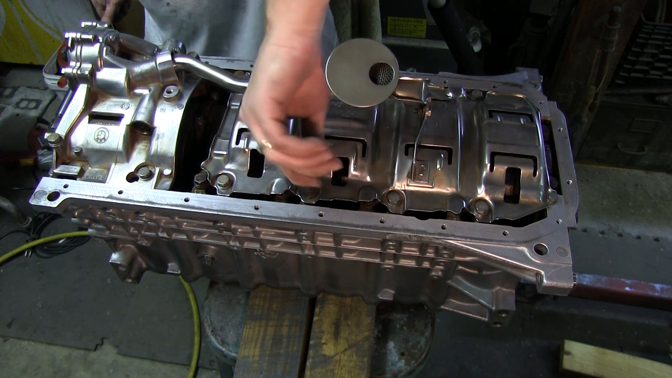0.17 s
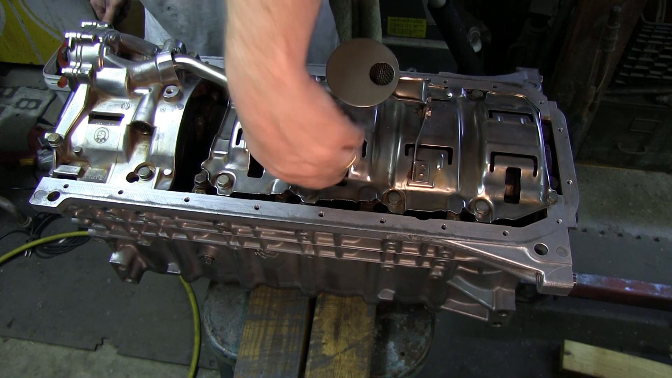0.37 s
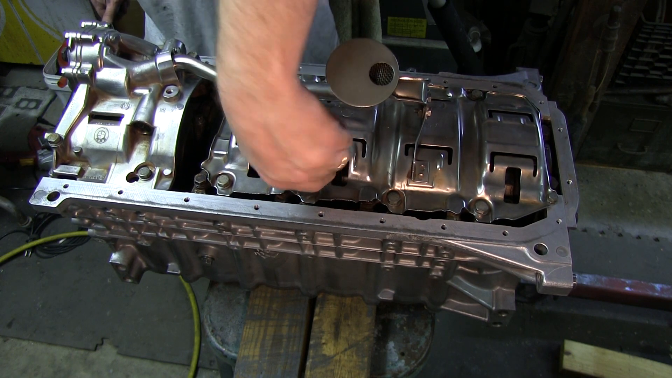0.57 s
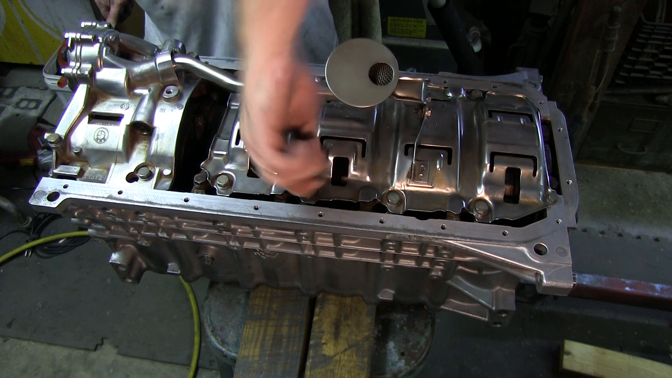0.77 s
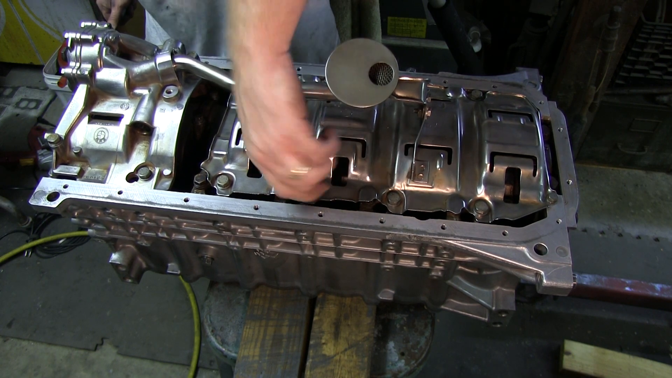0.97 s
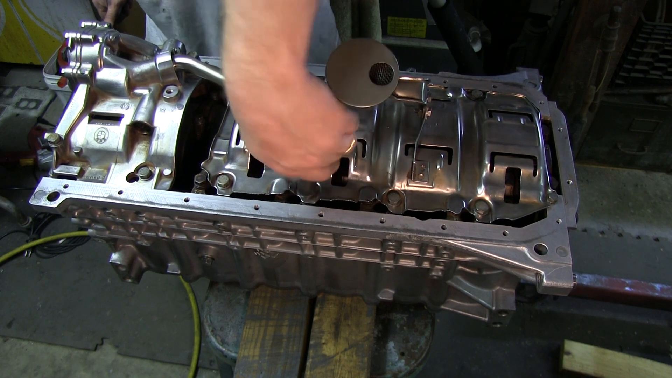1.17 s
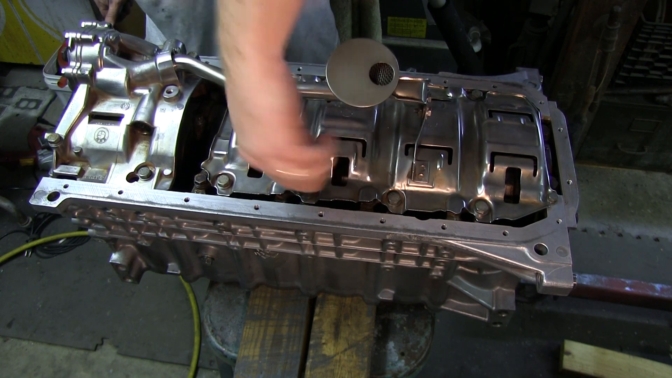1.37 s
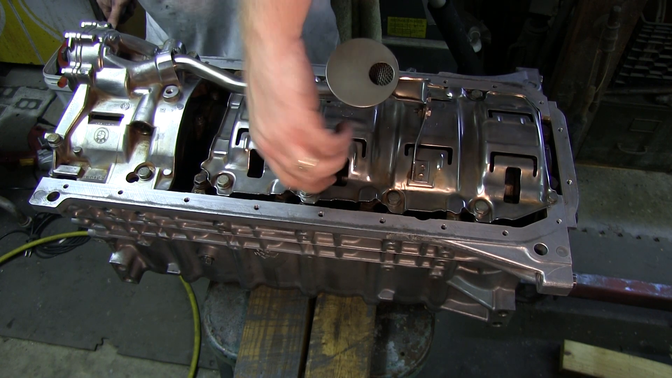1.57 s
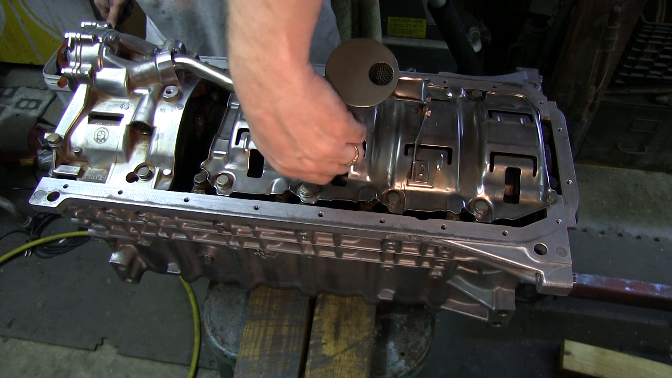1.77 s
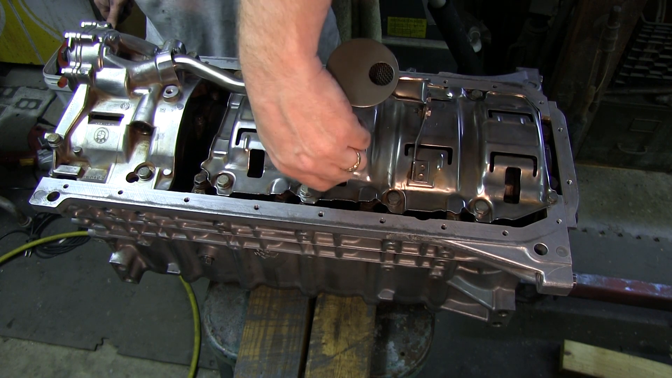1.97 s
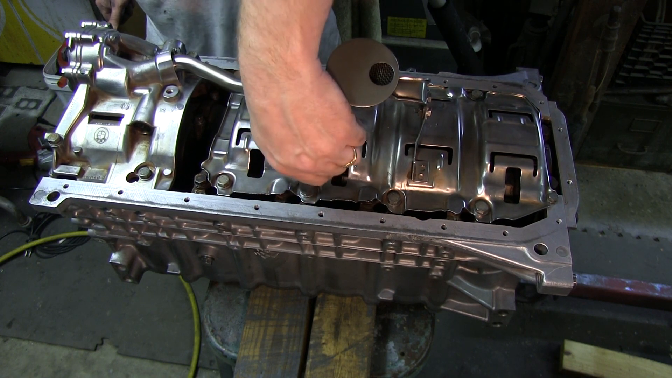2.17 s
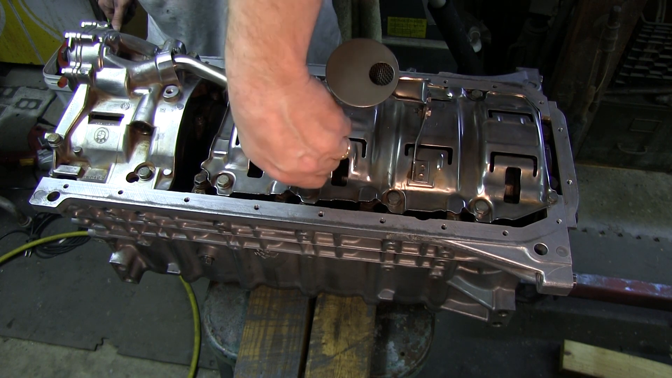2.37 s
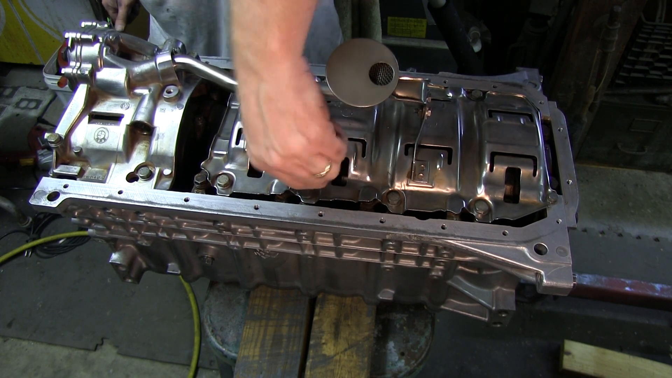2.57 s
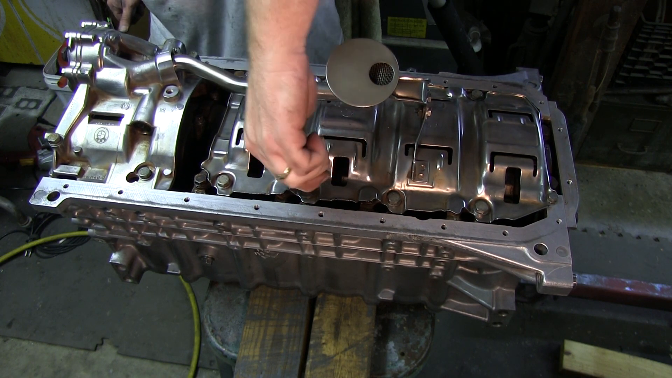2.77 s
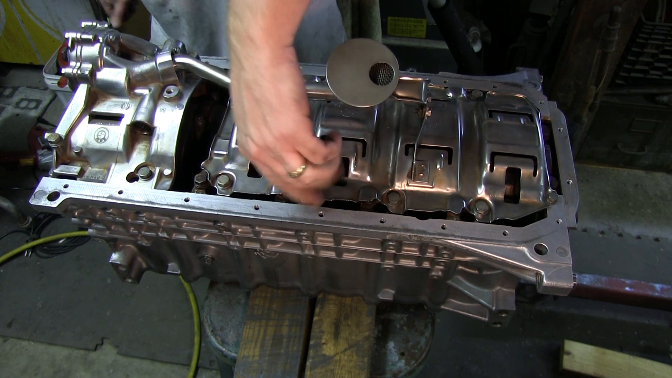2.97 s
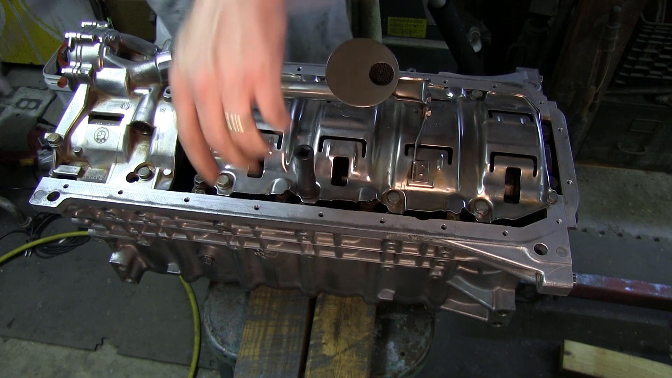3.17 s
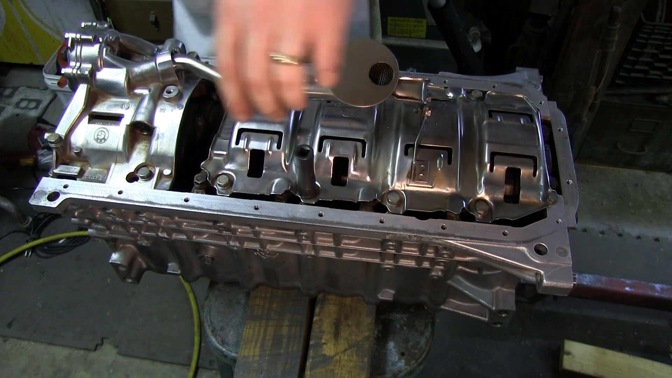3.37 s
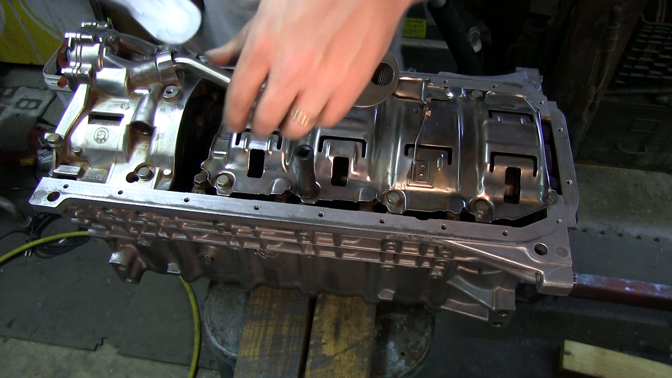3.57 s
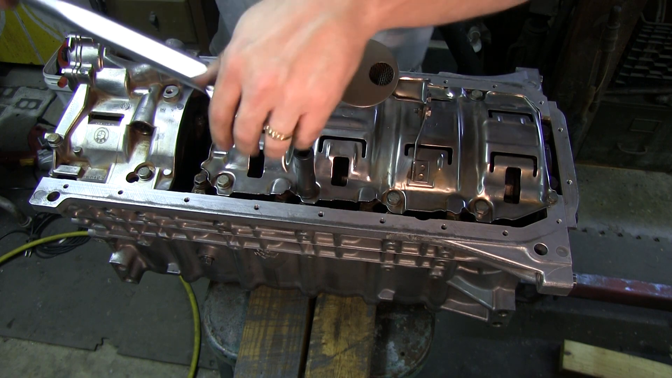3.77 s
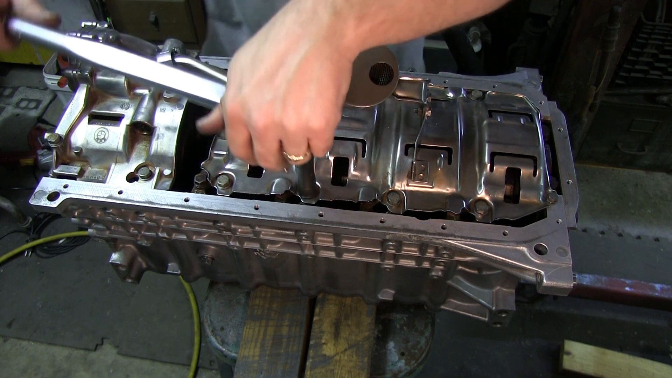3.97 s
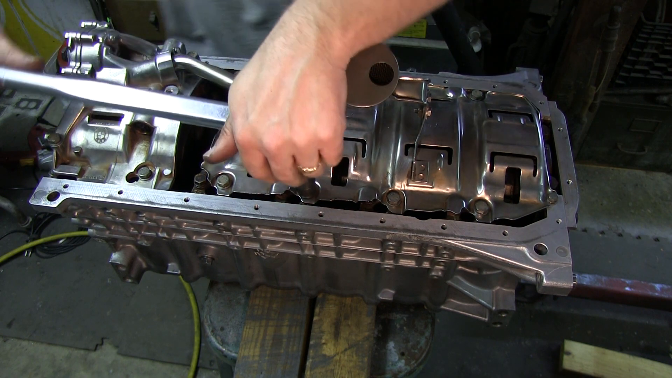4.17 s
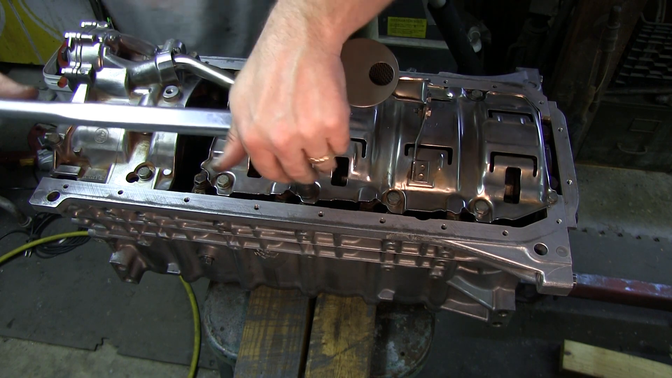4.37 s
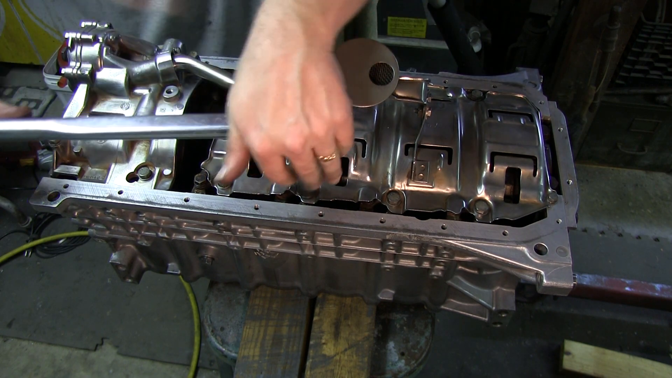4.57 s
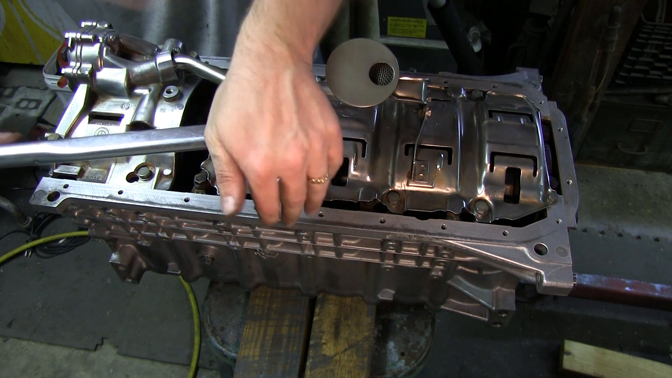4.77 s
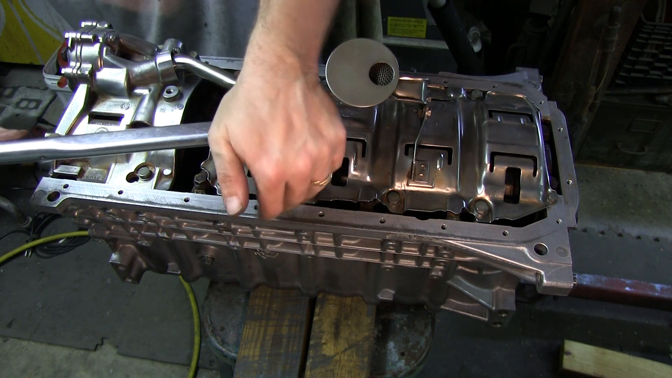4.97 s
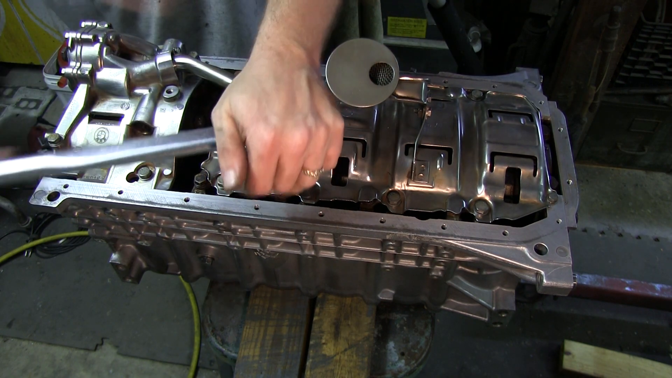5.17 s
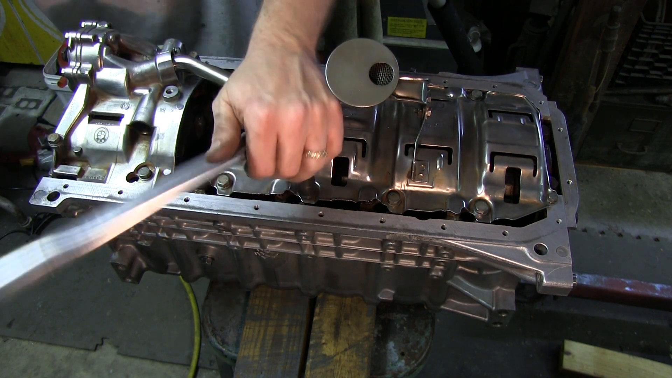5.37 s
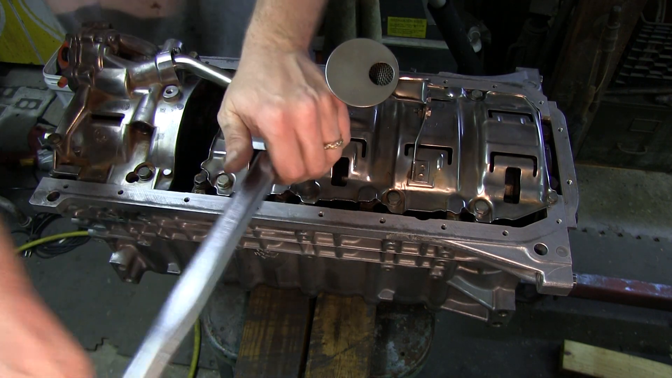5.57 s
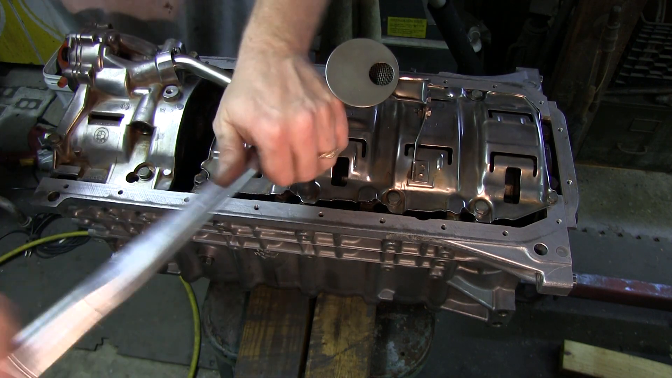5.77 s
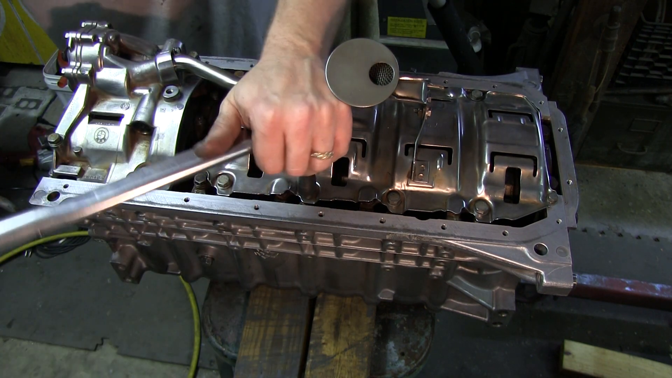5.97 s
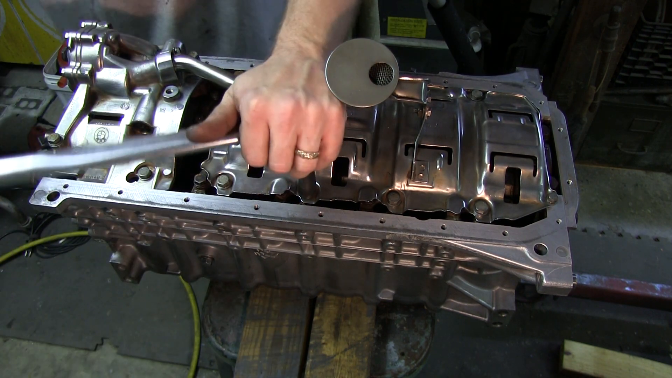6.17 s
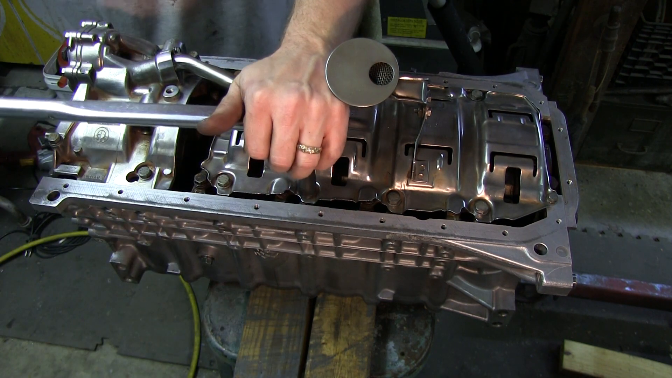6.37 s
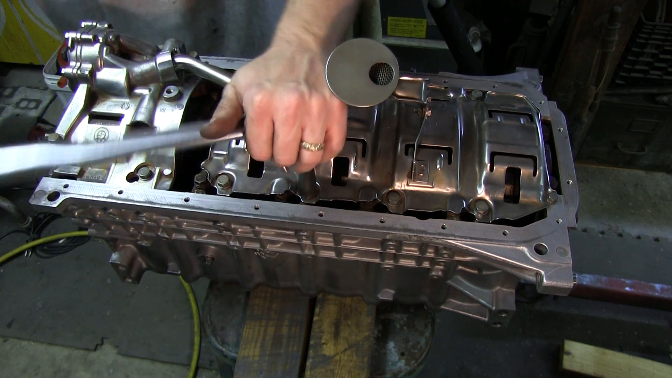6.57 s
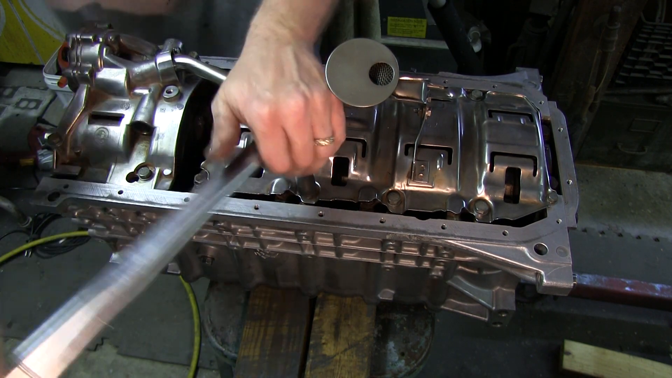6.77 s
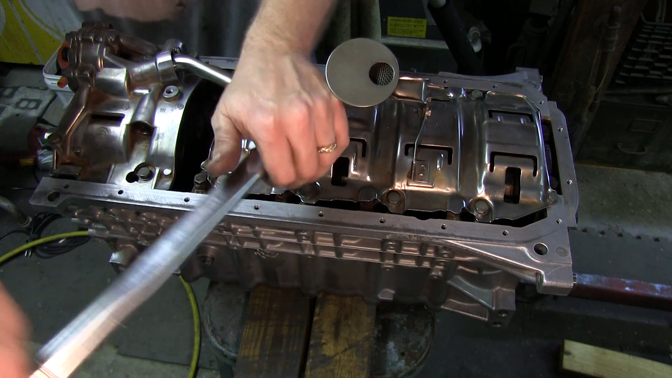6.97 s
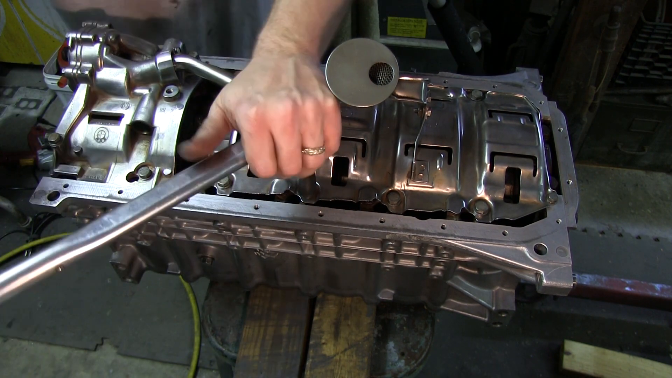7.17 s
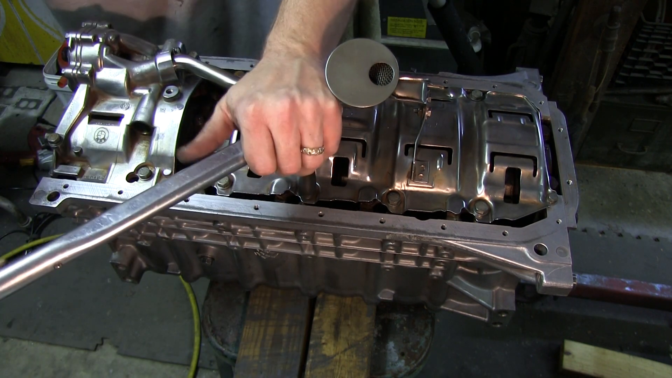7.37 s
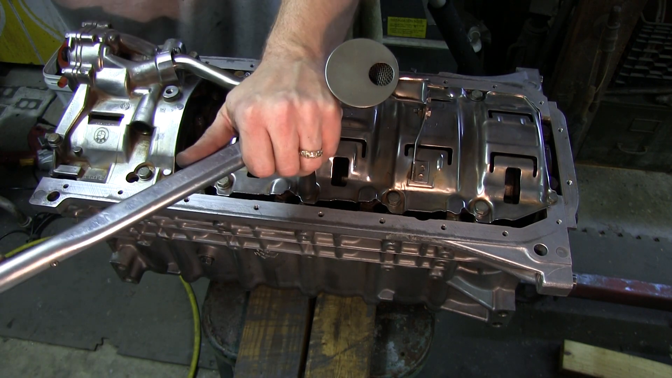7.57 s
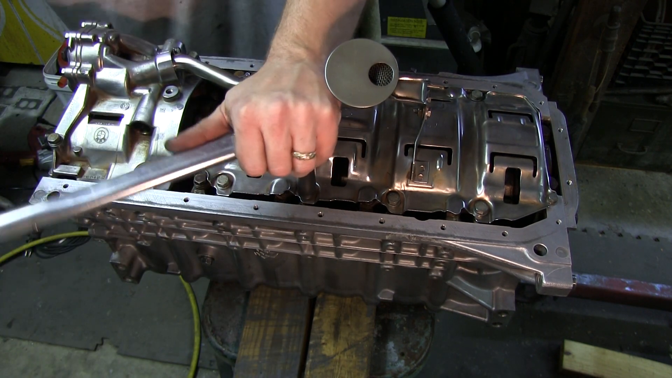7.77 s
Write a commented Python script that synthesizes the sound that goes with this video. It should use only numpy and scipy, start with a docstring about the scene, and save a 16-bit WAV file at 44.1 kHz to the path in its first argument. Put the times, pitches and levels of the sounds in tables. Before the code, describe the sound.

A faint ballast hum, soft air noise and a wavering low drone lie under everything in a garage, heard close with short reverberation. From 0 to 1.5 s a steel socket rubs and rocks on an engine bolt: gritty short scrapes and irregular dull clinks, growing busier around 0.3-0.5 s, with a loud clank at 1.08 s. From 1.58 to 2.4 s hard, full metallic clacks seat it, singly and in close pairs. Then it is nearly quiet, with only tiny touches around 2.6-3.4 s. At 4.19 s a sharp wrench knock rings out, with more at 4.46-4.65 and 4.92-5.0 s, mixed with brief scrapes. Four crisp ratchet clicks run from 5.39 to 5.66 s, with faint ticks after. Another quick burst begins weakly at 6.57 s and sharpens through 6.86 s, capped by a strong clank at 7.0 s. Its ring dies away into room tone, with one barely audible touch at 7.75 s.

```python
"""Ballast hum, air noise and a low drone in a garage are joined at once by a steel socket rubbing and rocking
by hand on a bolt of an upturned engine. Hard blows seat it; then a long ratchet wrench is put on, pulled and
swung back over its pawl. Each contact excites decaying modes of a thin tray, a stiff brace and the block, with
dense noise for the countless small modes; friction is irregular noise through the same resonances.
Hum and drone are sines, the air is shaped noise, and a fast limiter holds the loudest blows."""
import sys
import numpy as np
from scipy import signal
from scipy.fft import rfft, irfft, next_fast_len
from scipy.io import wavfile
from scipy.ndimage import uniform_filter1d, minimum_filter1d, map_coordinates

SR = 44100
rng = np.random.default_rng(int(sys.argv[2]) if len(sys.argv) > 2 else 0)


def persist_wave(psi):
    """Save psi, clipped to +-1, as 16-bit WAV."""
    counts = np.round(np.clip(psi, -1, 1) * 32767).astype(np.int16)
    wavfile.write(sys.argv[1], SR, np.atleast_2d(counts).T)


N = 344845

# Levels in the tables are relative: the functions add a common offset to each layer.
# Spectrum of the air noise: (f/Hz, level per Hz/dB)
AIR_SPECTRUM = [(20, -35), (60, -23), (117, -15.5), (206, -12.5), (297, -10), (535, -11), (900, -15.5),
                (1470, -20.5), (5000, -28), (15100, -36.5), (16500, -52)]
# Course of the air noise: (t/s, level/dB)
AIR_COURSE = [(0, -54.5), (2.5, -59), (3.6, -55), (5, -55), (6.2, -56), (7.82, -58)]
# Hum lines of the ballasts: (f/Hz, level/dB, waver rate/(knots per s))
HUM_LINES = [(116.6, -66, 4.06), (173, -66.5, 1.33), (240.9, -52, 2.774), (305.6, -60.5, 19)]
# Swelling and sinking of the low drone outside: (t/s, level/dB)
DRONE_COURSE = [(0, -73), (.7, -55.5), (1.05, -67), (3.3, -67.5), (3.75, -61), (4.6, -59.5), (6.05, -64.5),
                (6.35, -60), (7.82, -70)]
# Strokes of the socket on the bolt head: (start t/s, hold/s, level/dB, treble/dB, tray/dB)
RUB_STROKES = [(0, .17, -43.5, -21, 3), (0.427, 0.16, -42, -12, -7), (.68, .04, -49.5, -16, -16),
               (0.846, .02, -31.5, -9, -1), (1.2, 0.051, -51, -8, -6), (1.397, 0.16, -33.5, -10.5, -5),
               (2.118, .04, -22, -26, -15), (3.467, 0.22, -54, -10, -5), (4.422, 0.092, -35.5, -7.5, -3),
               (4.553, 0.092, -33, -5, -4), (5.057, .03, -34, -1, 3.5), (5.85, .01, -34, -36, -12)]
# Spectrum of rubbed steel: (f/Hz, level/dB)
GRIND_SPECTRUM = [(200, -45), (450, -20), (1000, 9.5), (2000, 7), (4000, -7), (5000, -2), (9000, -7),
                  (16000, -20.5)]

# Modes of each body, with free decay times before the grip acts: (f/Hz, level/dB, t60/s)
DRUM_MODES = [(297, 2.5, 0.12), (506, -6, 0.12)]  # lowest panels of the tray
TRAY_MODES = [(758, 0, .11), (793, 0, .13), (835, -9, .15), (883, -11, .28)]
BRACE_MODES = [(1254, -10, .65), (1333, 4, .56), (1360, -10, .5), (1401, -12, .6)]
BLOCK_MODES = [(1510, -9, .3), (1560, -9, .3), (1693, -7, .25), (1775, -3, .22), (1803, -5, .26),
               (1940, -6, .28), (2134, 0, .26), (2237, -4, .25), (2540, -7, .26), (2660, -8, .28),
               (2812, -11, .2), (3220, -12, .25), (3472, -11, .2), (3935, -13, .2), (4300, -6, .22),
               (4544, -17, .36), (5400, -14, .2), (5838, -11, .25), (6800, -20, .4), (6945, -19, .5)]
SOCKET_BRACE_MODES = [(1022, -12.5, 0.31), (1139.5, 1, 0.17), (1210, 0, 0.21)]  # brace modes that the socket adds
WRENCH_BRACE_MODES = [(1227, -14, .7), (1360, 1.5, .6)]  # brace modes that the wrench adds
# Mode clusters of the ratchet head: (f/Hz, width/Hz, level/dB)
HEAD_CLUSTERS = [(6600, 140, 5), (8600, 360, 3), (10500, 670, 0.5), (12600, 330, -4), (13200, 520, 8.5)]
# Spectrum of the countless small modes: (f/Hz, level/dB)
CLATTER_SPECTRUM = [(200, -24), (600, -13), (1200, 6), (2000, -3), (4000, -2), (7000, -6), (12000, -12),
                    (16000, -25.5)]
# Decay of the small modes before the grip acts: (f/Hz, t60/s)
CLATTER_DECAY = [(300, 0.04), (1500, 0.15), (4000, 0.095), (9000, 0.091), (16000, 0.052)]
# Reverberation of the garage: (f/Hz, t60/s)
GARAGE_DECAY = [(300, 0.48), (1500, 0.43), (5000, 0.31), (10000, 0.25), (16000, 0.32)]

# Contacts; tray, brace and treble are relative to the contact level, the clink is a favoured band.
# Loose socket rocking, and faint touches:
# (t/s, level/dB, tray/dB, brace/dB, treble/dB, clink f/Hz, drum level/dB)
ROCKING_CONTACTS = [(0.037, -37, -10, 3, -22, 2080, -51), (0.1129, -34.5, 11, 0, -34, 1790, -41),
                    (0.1639, -32, -4, -9, -16, 1600, -37), (0.2315, -28.5, 11.5, -1, -52, 1800, -31),
                    (0.3214, -23.5, 10, -11, -22, 1770, -39), (0.3378, -20, 9, -2, -26, 1960, -36.5),
                    (0.418, -22, 10, -1, -25, 1810, -33), (0.45, -29, 6, 7.5, -39, 1810, -37),
                    (0.4729, -22, 3.5, -14, -24, 1740, -26), (0.4858, -25, -5, 8, -6, 2040, -30),
                    (0.5144, -31, -12, 8.5, -23, 1620, -49), (0.5928, -29, -23, -0.5, -13, 3900, -39),
                    (0.6208, -23, -35, -16, -32, 3380, -53), (0.7537, -23.5, 17.5, -6, -19, 1760, -27.5),
                    (0.866, -22, 8.5, -3, -14, 2080, -26.5), (0.9454, -23.5, 7.5, 1, -29, 2040, -40),
                    (1.0455, -27, 25, 5, -31, 2120, -58), (1.0624, -19.5, -10, -26, -28, 1820, -24),
                    (1.0791, -6, -4.5, -4.5, -6.5, 1790, -26), (1.1092, -27, -14, -22, -31, 1860, -41),
                    (1.154, -15, 3, -13, -59, 1640, -30.5), (1.3367, -33, 17, 4, -20, 2060, -55),
                    (1.3902, -25, 7, -0.5, -26, 1800, -42), (1.4289, -23.5, -6, -1, -41, 2080, -39),
                    (1.544, -33, -23, 5, -28, 1940, -59), (2.6134, -45.5, -15, -23, -3, 2130, -58),
                    (2.9366, -31.5, -11, -5, -31, 2020, -60), (3.0326, -40, -16, -0.5, -31, 1780, -57),
                    (3.109, -39.5, -18, -24, -13, 2230, -56), (3.4224, -37, -1, -12, -15, 1680, -47),
                    (3.4413, -33, -21, -28, -18, 1660, -43), (4.1328, -50, 3, -11, -19, 1670, -32.5),
                    (5.7816, -37, -2, -2, -33, 1740, -40.5)]
# Socket pushed home hard: (t/s, level/dB, tray/dB, brace/dB, treble/dB, clink f/Hz)
SEATING_CONTACTS = [(1.5784, -7.5, -43, -19, -32, 2460), (1.5958, -7, -27, -11.5, -23, 3190),
                    (1.7651, -2.5, -17.5, 0, -21, 2040), (2.0452, -2, -22.5, -10, -18, 1850),
                    (2.1714, -3.5, -31, -14, -27.5, 2580), (2.3717, 1.5, -35, -18.5, -16.5, 1720),
                    (2.3997, -1.5, -24, -8, -37, 2270)]
# Wrench taking up its play: (t/s, level/dB, tray/dB, brace/dB, treble/dB, clink f/Hz, clink/dB)
WRENCH_CONTACTS = [(4.1853, 3.5, -28.5, -19, -26.5, 2080, 5), (4.2425, -12, -26, -9.5, -26, 3840, 10),
                   (4.4574, -5, -19, -30, -31, 5140, 14.5), (4.6277, -1.5, -16, -12.5, -19, 2120, 7.5),
                   (4.6537, -3.5, -19, -19.5, -24.5, 1870, 3.5), (4.9236, -8, -31, -11, -28, 1800, 15),
                   (4.9434, -32, -28, -13, -43, 1650, 6), (4.992, -27, -25, -27, -10, 2700, 3),
                   (4.997, 2, -28.5, -20.5, -14, 2790, 11), (5.2989, -38.5, -25, -27, -17, 2420, 5),
                   (5.382, -24.5, -46, -33, -12, 2600, 3), (5.4083, -9.5, -29, -13, -33, 1830, 5),
                   (5.8195, -23, -29, -17, -31, 1780, 4), (5.8422, -20.5, -10, -21, -36, 1840, 9),
                   (6.721, -27, -32, -25, -4, 3000, 3), (6.985, -18.5, -41, -17, -25, 2300, 8),
                   (7.008, 0, -35.5, -32.5, -20.5, 3620, 2.5), (7.7503, -41, -18, -21, -20, 1880, 8)]
# Pawl dropping over each tooth: (t/s, level/dB, tray/dB, brace/dB, treble/dB, clink f/Hz, clink/dB)
PAWL_CONTACTS = [(5.3876, -11.5, -28, -32, -11, 1830, 7.5), (5.4856, -13.5, -50, -21, -8.5, 1850, 8),
                 (5.5647, -10.5, -29, -19, -6.5, 2030, 5.5), (5.657, -12, -30, -20.5, -6, 3300, 5),
                 (6.574, -25.5, -8.5, -9.5, -48, 2140, 20), (6.658, -23, -8, -15, -33, 1960, 14),
                 (6.7295, -9.5, -22.5, -30, -9.5, 2970, 6.5), (6.789, -9, -23.5, -36, -11, 3100, 2),
                 (6.8637, -9, -25, -23, -8.5, 6740, 4.5)]

TOP_HZ = 15800
RUB_RISE_DB_PER_S, RUB_FALL_DB_PER_S, RUB_REST_DB = 243, 225, -67
# Relative thud of the lowest panels, for a contact of -10 dB
BLOW_DRUM_DB, WRENCH_DRUM_DB, PAWL_DRUM_DB = -42.5, -41, -46
DRUM_DB_PER_DB = 0.37  # thud gained per dB of contact
SOCKET_CLINK_DB, BLOW_CLINK_DB = 9, 4.8  # lift of the favoured band
SLOWER_DB_PER_DB = .2  # the more a contact moves the thin tray, the slower it starts
LONGER_PER_DB = 0.01  # ring share gained by a contact one dB harder


def amp(db):
    """The amplitude ratio is ten to the power of level/dB over twenty."""
    return 10 ** (np.asarray(db) / 20)


def unit(x):
    """Division by the root mean square gives a signal of unit rms."""
    return x / np.sqrt(np.mean(x ** 2) + 1e-20)


def along(points, hz):
    """A spectrum is interpolated between its points on a logarithmic frequency axis."""
    f, v = np.transpose(points)
    return np.interp(np.log(hz + 1), np.log(f + 1), v)


def curves(rows):
    """Linear interpolation in time gives one value per sample for each column after t/s."""
    s, *cols = np.transpose(rows)
    return [np.interp(np.arange(N) / SR, s, c) for c in cols]


def wobble(rate):
    """A spline through random knots, rate of them per second, gives a smooth fluctuation."""
    knots = rng.standard_normal(int(N * rate / SR) + 4)
    return map_coordinates(knots, [np.arange(N) * rate / SR])


def filtered(x, response):
    """Linear filtering multiplies the spectrum by a complex response of frequency."""
    m = next_fast_len(len(x) + SR // 2)
    return irfft(rfft(x, m) * response(np.fft.rfftfreq(m, 1 / SR)), m)[:len(x)]


def garage_air():
    """Broadband noise has a continuous spectrum; the ballasts add slightly unsteady discrete lines."""
    noise = unit(filtered(rng.standard_normal(N), lambda f: amp(along(AIR_SPECTRUM, f))))
    air = noise * amp(curves(AIR_COURSE)[0] + 8.0 + 1.2 * wobble(2.476))
    t = np.arange(N) / SR
    hum = np.zeros(N)
    for hz, db, rate in HUM_LINES:
        level = amp(db + 2.5) * (1 + 0.1 * wobble(rate))
        hum += level * np.sin(2 * np.pi * hz * t + 0.17 * wobble(rate))
    return air + hum


def drone():
    """Slow random modulation of amplitude and phase makes a 77 Hz sine unsteady."""
    level = amp(curves(DRONE_COURSE)[0] + 1.0 + 2.5 * wobble(9.3))
    return level * np.sin(2 * np.pi * 77 * np.arange(N) / SR + 0.55 * wobble(8))


def strokes():
    """The strongest stroke dominates: its rise, hold and fall set level, treble and tray share."""
    start, hold, db, treble_db, tray_db = np.transpose(RUB_STROKES)
    t = np.arange(0, N / SR + .01, .002)
    since = t - start[:, None]
    rise = RUB_RISE_DB_PER_S * np.minimum(since, 0)
    fall = RUB_FALL_DB_PER_S * np.maximum(since - hold[:, None], 0)
    level = db[:, None] + rise - fall
    top = level.argmax(axis=0)
    strongest = np.maximum(level.max(axis=0), RUB_REST_DB)
    return curves(np.transpose([t, strongest, treble_db[top], tray_db[top]]))


def resonances(modes):
    """Each mode is a resonance whose bandwidth is inversely proportional to its decay time."""
    def response(f):
        total = 0
        for c, db, t60 in modes:
            width = np.log(1000) / np.pi / t60
            total = total + amp(db) * (1j * f * width / (c * c - f * f + 1j * f * width))
        return total
    return response


def rubbing():
    """Friction of steel on steel is spiky noise that drives the modes and a broadband grind."""
    level_db, treble_db, tray_db = strokes()
    spikes_db = 2.4 * wobble(400) + 3.4 * wobble(29.95)
    grains = unit(rng.standard_normal(N) * amp(spikes_db)) * amp(level_db)
    steel = amp(18.0) * filtered(grains, resonances(BRACE_MODES + SOCKET_BRACE_MODES + BLOCK_MODES))
    tray = amp(20) * filtered(grains * amp(tray_db), resonances(TRAY_MODES))
    body = filtered(grains, lambda f: amp(along(GRIND_SPECTRUM, f)) * (f < 5000))
    treble_grains = grains * amp(treble_db + 9.0)
    treble = filtered(treble_grains, lambda f: amp(along(GRIND_SPECTRUM, f)) * (f >= 5000))
    return steel + tray + body + treble


def dying(decays, gain_db, length):
    """Dense modes act as noise whose every frequency decays at its own rate; total energy is 1."""
    hz, t, z = signal.stft(rng.standard_normal(length), SR, nperseg=192)
    level_db = gain_db(hz)[:, None] - 60 * t / along(decays, hz)[:, None]
    x = signal.istft(z * amp(level_db), SR, nperseg=192)[1][:length]
    return x / np.linalg.norm(x)


def ringer(modes, t):
    """Modal superposition sums decaying sines; each call strikes them at new random strengths."""
    hz, db, t60 = np.transpose(modes)
    rings = np.exp(np.outer(2j * np.pi * hz - np.log(1000) / t60, t)).imag

    def strike(scatter_db, colour=np.zeros_like):
        return amp(db + colour(hz) + scatter_db * rng.standard_normal(len(hz))) @ rings
    return strike


def contact_colour(treble_db, brace_db, clink_hz, clink_db):
    """Contact hardness tilts the top, a weak brace share cuts the bottom, the spot hit favours a band."""
    def colour(hz):
        top = along([(3500, 0.019), (9000, 0.85), (15000, 1.56)], hz) * (treble_db + 14.0)
        bottom = along([(1300, 0.87), (1900, 0.039)], hz) * np.minimum(brace_db + 8.0, 0)
        clink = clink_db * np.exp(-(np.log((hz + 1) / clink_hz) / 0.12) ** 2)
        return top + bottom + clink
    return colour


def contacts(table, brace, clusters, modes_db, clatter_db, rise_s, ring_share):
    """An impact excites several bodies at once, and the walls reverberate its clatter and tray sound.

    Rows: (t/s, level/dB, tray/dB, brace/dB, treble/dB, clink f/Hz, clink/dB, drum level/dB)."""
    out = np.zeros(N + 2 * SR)
    t = np.arange(int(.45 * SR)) / SR
    ring_block, ring_drum = ringer(BLOCK_MODES, t), ringer(DRUM_MODES, t)
    ring_tray, ring_brace = ringer(TRAY_MODES, t), ringer(brace, t)
    fade_out = np.minimum(1, 20 * (t[-1] - t))
    for s, db, tray_db, brace_db, treble_db, clink_hz, clink_db, drum_db in table:
        colour = contact_colour(treble_db, brace_db, clink_hz, clink_db)

        def clatter_gain_db(hz):
            """Each impact wakes another random choice of the small modes."""
            humps = sum(lift * np.exp(-((hz - c) / w) ** 2) for c, w, lift in clusters)
            return along(CLATTER_SPECTRUM, hz) + colour(hz) + humps + 3 * rng.standard_normal(len(hz))

        clatter = dying(CLATTER_DECAY, clatter_gain_db, len(t))
        block = ring_block(scatter_db=2.5, colour=colour)
        brace_ring = ring_brace(scatter_db=1)
        # the drum level is given absolutely: the contact level that the shape applies below is taken out
        drum = amp(drum_db - db + 2.5) * ring_drum(scatter_db=1.5)
        tray = drum + amp(tray_db - 4) * ring_tray(scatter_db=2)
        # a gripping hand shortens the ring: the share scales a t60 of 0.43 s (above 1 it lengthens)
        share = np.clip(ring_share + LONGER_PER_DB * (db + 15.5), .2, 1.5)
        grip = amp(-60 * t / 0.43 * (1 / share - 1))
        rise = max(rise_s * amp(SLOWER_DB_PER_DB * tray_db), 1e-4)
        shape = amp(db) * (1 - np.exp(-(t / rise) ** 2)) * grip * fade_out
        clatter_and_tray = shape * (amp(clatter_db) * clatter + tray)
        block_and_brace = shape * (amp(modes_db) * block + amp(brace_db - 7) * brace_ring)
        # only the clatter and tray sounds feed the reverberation; the block and brace modes stay dry
        garage = dying(GARAGE_DECAY, np.zeros_like, len(t))
        echo = signal.fftconvolve(clatter_and_tray[:len(t) // 2], garage)
        out[round(s * SR):][:len(t)] += clatter_and_tray + block_and_brace
        out[round((s + .006) * SR):][:len(echo)] += amp(-8.5) * echo
    return out[:N]


def with_drum(table, drum_db, *clink_db):
    """The lowest panels thud harder under a harder contact, though less than in proportion."""
    return [(*row, *clink_db, drum_db + DRUM_DB_PER_DB * (row[1] + 10)) for row in table]


def socket_rocking():
    """Light impacts of a loose, hand-damped socket start slowly and ring briefly."""
    rows = [(*row, SOCKET_CLINK_DB, drum_db) for *row, drum_db in ROCKING_CONTACTS]
    return contacts(rows, BRACE_MODES + SOCKET_BRACE_MODES, [],
                    modes_db=-16.5, clatter_db=21.5, rise_s=0.004, ring_share=0.67)


def socket_seating():
    """Hard impacts through the socket start faster and ring longer than its rocking."""
    rows = with_drum(SEATING_CONTACTS, BLOW_DRUM_DB, BLOW_CLINK_DB)
    return contacts(rows, BRACE_MODES + SOCKET_BRACE_MODES, [],
                    modes_db=-15.5, clatter_db=19.5, rise_s=0.0019, ring_share=0.87)


def wrench_knocks():
    """Backlash ends in abrupt impacts, with the added modes of the wrench and its ratchet head."""
    rows = with_drum(WRENCH_CONTACTS, WRENCH_DRUM_DB)
    return contacts(rows, BRACE_MODES + WRENCH_BRACE_MODES, HEAD_CLUSTERS,
                    modes_db=-22.0, clatter_db=17.0, rise_s=0.00097, ring_share=1.074)


def pawl_clicks():
    """Each tooth passed releases the pawl into an impact rich in small modes."""
    rows = with_drum(PAWL_CONTACTS, PAWL_DRUM_DB)
    return contacts(rows, BRACE_MODES + WRENCH_BRACE_MODES, HEAD_CLUSTERS,
                    modes_db=-19.5, clatter_db=23.5, rise_s=0.0014, ring_share=0.82)


def scene():
    """Sound pressures superpose linearly at one microphone."""
    background = garage_air() + drone()
    socket = rubbing() + socket_rocking() + socket_seating()
    wrench = wrench_knocks() + pawl_clicks()
    return (background + socket + wrench)[None]


def record(dry):
    """Limiting lowers the gain around peaks near full scale; a low-pass then bounds the band."""
    need = np.minimum(1, .98 / (np.abs(dry[0]) + 1e-9))
    gain = uniform_filter1d(minimum_filter1d(need, size=400), size=200)
    return filtered(dry[0] * gain, lambda f: f < TOP_HZ)[None]


dry = scene()
out = record(dry)
persist_wave(out)
```